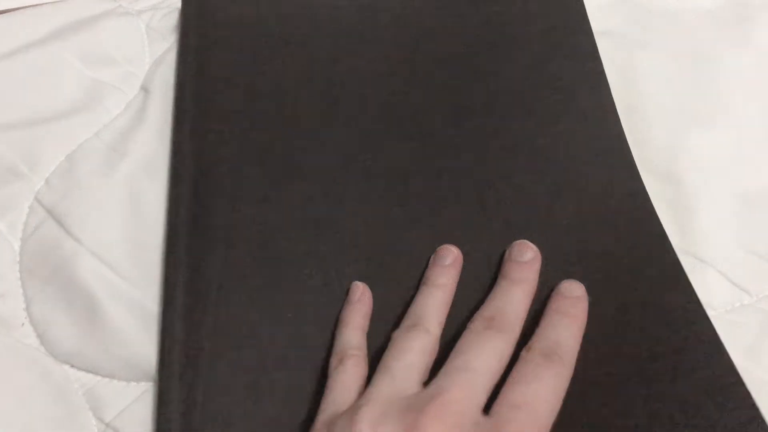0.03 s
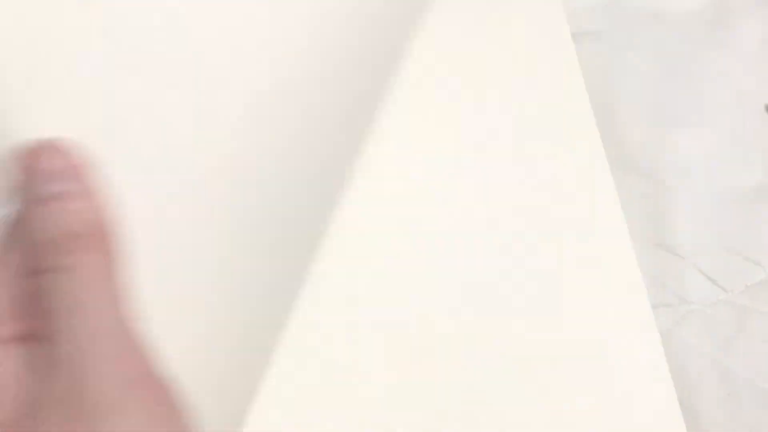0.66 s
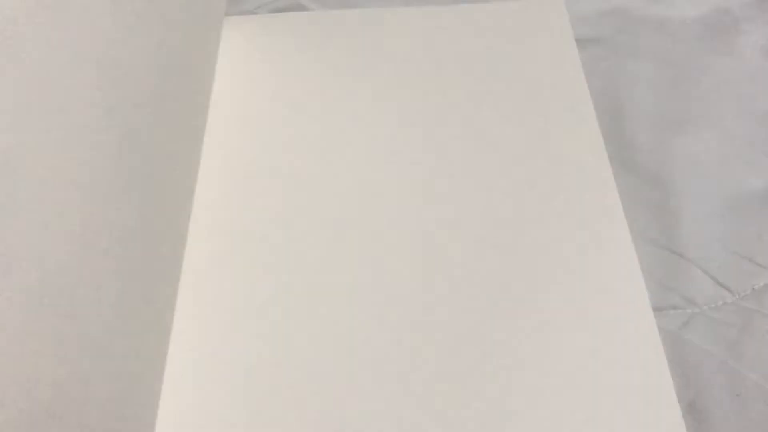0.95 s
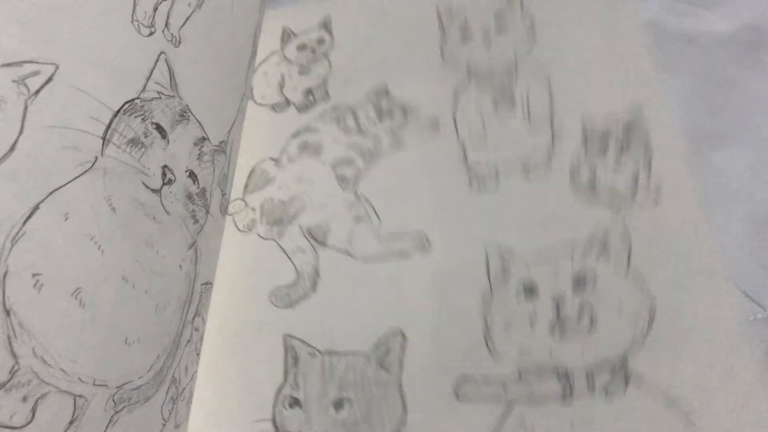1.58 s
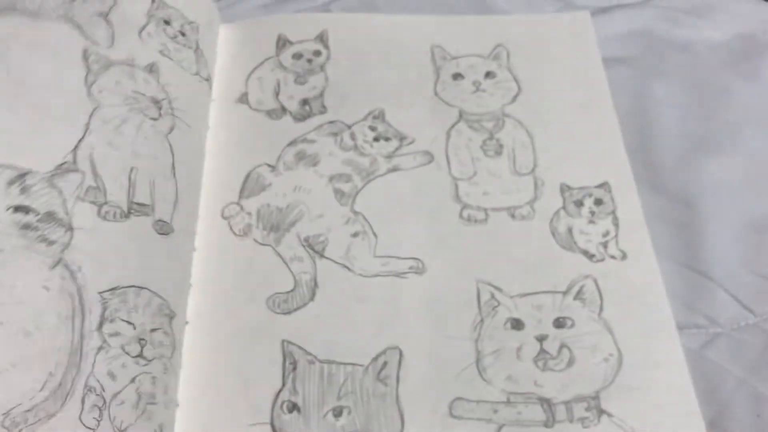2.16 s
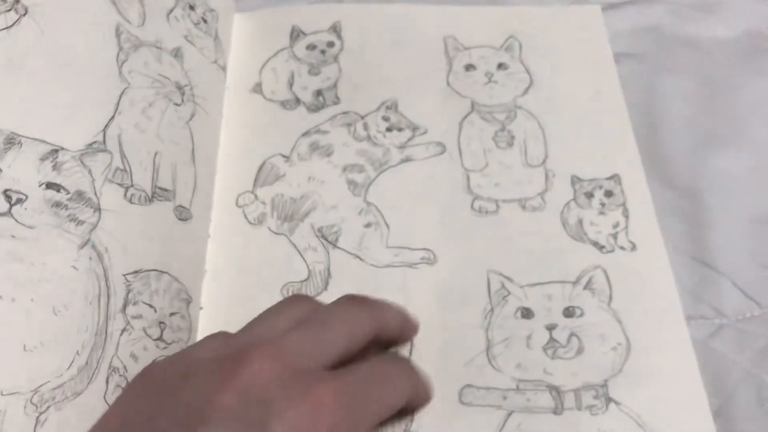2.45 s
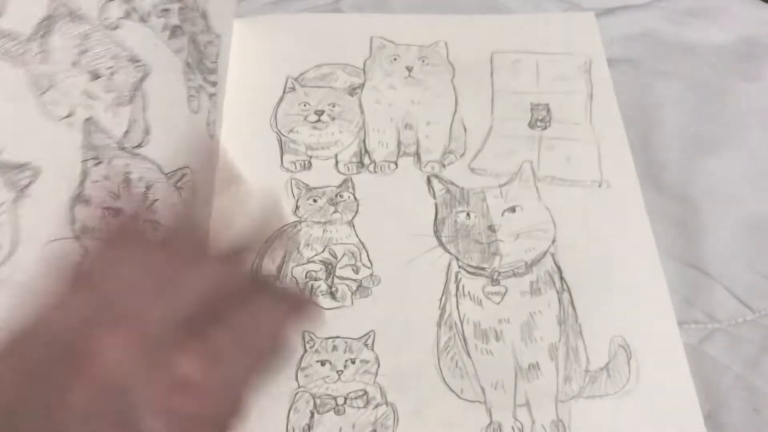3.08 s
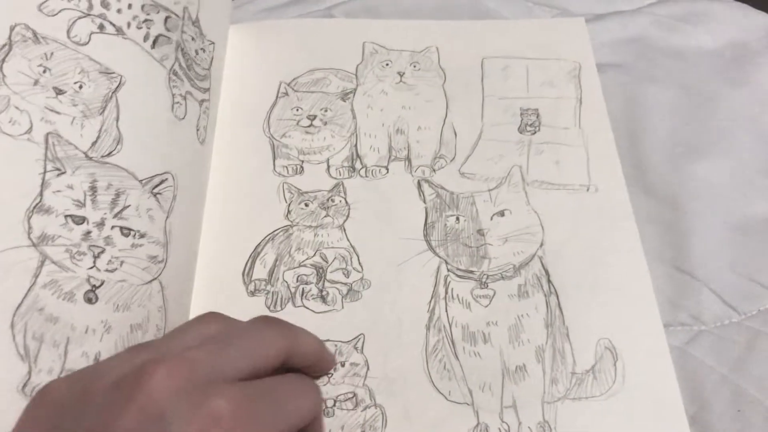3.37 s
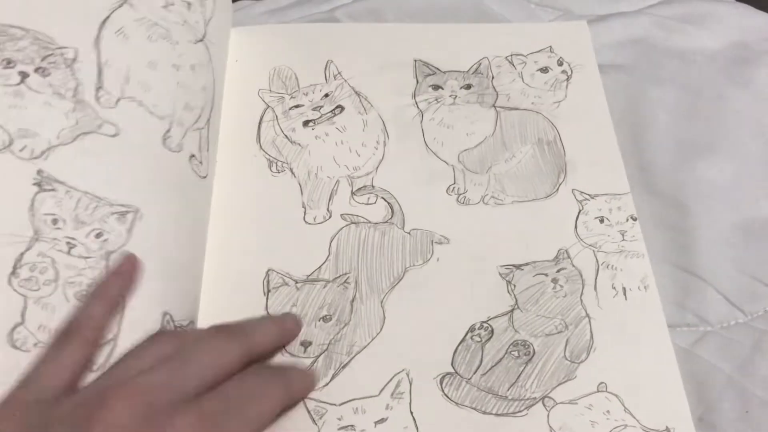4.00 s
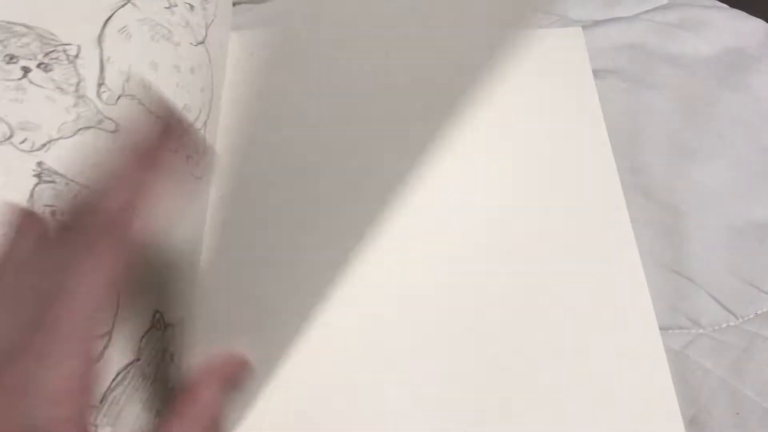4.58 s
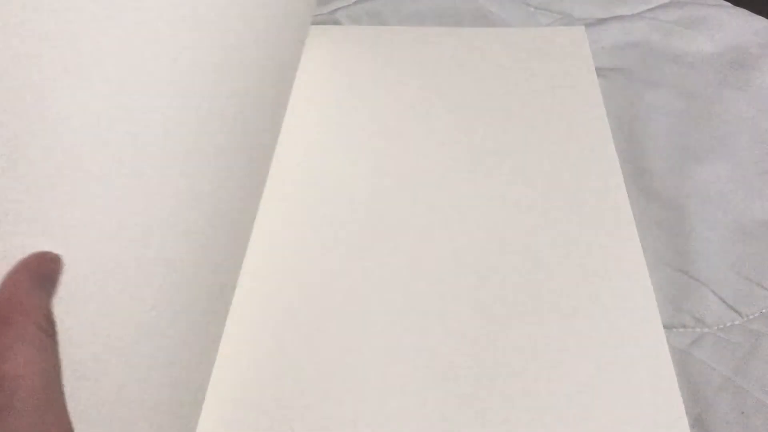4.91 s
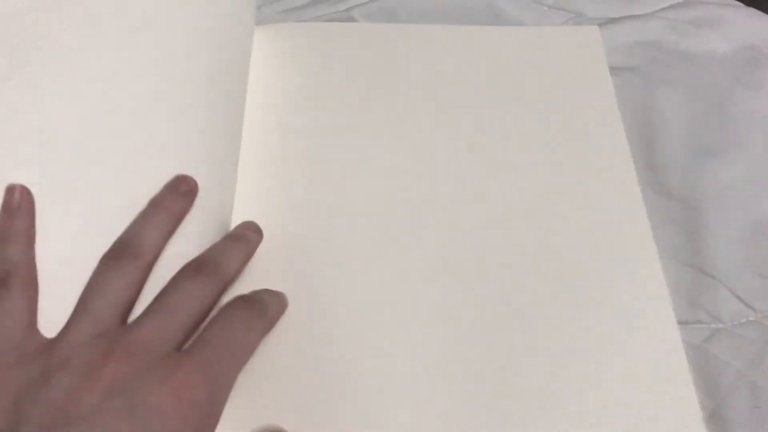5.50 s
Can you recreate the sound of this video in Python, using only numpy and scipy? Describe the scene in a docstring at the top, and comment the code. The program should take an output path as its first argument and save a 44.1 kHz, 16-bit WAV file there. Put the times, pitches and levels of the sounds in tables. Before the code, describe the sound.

Close, dry paper rustles and page turns, soft at first and then louder, with light ticks and a couple of crisp slaps.

```python
"""Leafing through a sketchbook.

A hardcover sketchbook on a quilt is opened and leafed through, close by in a quiet room.
Paper slides on paper and under fingers with a grainy hiss; the sheets resonate and flap, their edges
tick, and they buckle or land with short pops whose bending waves arrive treble first."""
import sys
import numpy as np
from scipy import signal
from scipy.fft import rfft, irfft, next_fast_len
from scipy.io import wavfile
from scipy.ndimage import map_coordinates

SR = 44100
rng = np.random.default_rng(int(sys.argv[2]) if len(sys.argv) > 2 else 0)


def wav_out(sig):
    """Save sig, one row per channel (or a flat mono array), as 16-bit PCM at SR to the path in sys.argv[1]."""
    wavfile.write(sys.argv[1], SR, np.round(np.clip(np.atleast_2d(sig).T, -1, 1) * 32767).astype(np.int16))


N = 249165
TIME = np.arange(N) / SR
# spectrum of edge ticks and crackle: (frequency [Hz], level [dB])
TICK_SPECTRUM = [(300, -4), (1500, -1), (5000, 0.5), (8000, -0.5), (15000, -1.5)]


def sliding():
    """Friction hisses at the contact and rings the sheet; the moving page pushes air and crinkles."""
    # spectra of friction, sheet resonance and flapping: (frequency [Hz], level [dB])
    hiss_spectrum = [(500, -53), (1500, -14), (3500, -4), (5500, -4), (6800, -0.5), (9300, 0.5),
                     (11000, -0.5), (13000, 1), (15500, 2)]
    sheet_spectrum = [(200, -19.5), (450, -8), (750, 0), (1100, 2.5), (1600, -0.5), (2150, -2.5),
                      (2800, 0.5), (3500, -4.5), (4700, -6), (5500, -3), (6700, -11.5), (14000, -21.5)]
    flap_spectrum = [(25, -31), (55, -0.5), (110, 5), (190, -0.5), (300, -1), (420, -14), (800, -17.5),
                     (2000, -45)]
    hiss_gain, sheet_gain, flap_gain = motion_gains()
    judder = wander(rate_hz=140)  # uneven stick-slip
    hiss = colour(grit(per_s=7600, spread_db=0.5, smooth=1.0), hiss_spectrum)
    hiss = flex(hiss, depth_db=5.0, rate_hz=27)
    sheet = colour(grit(per_s=2500, spread_db=0.5, smooth=0.97), sheet_spectrum)
    sheet = flex(sheet, depth_db=2.47, rate_hz=22)
    flap = colour(rng.standard_normal(N), flap_spectrum)
    return (glance(hiss) * hiss_gain * undb(0.75 * judder)
            + glance(sheet) * sheet_gain * undb(1.9 * judder)
            + (flap + crackle()) * flap_gain)


def motion_gains(rest_hiss_db=-66.5, rest_sheet_db=-72.5, drag_flap_db=-15):
    """Strokes and page swings add in power to give the hiss, sheet and flap gains."""
    # sliding strokes: (time [s], length [s], crest [share of length], hiss [dB], sheet [dB])
    strokes = [(0.185, 0.38, 0.62, -61, -60), (0.297, 0.19, 0.5, -48, -63),
               (0.654, 0.56, 0.37, -66.5, -62.5), (0.96, .07, 0.52, -55.5, -54.5),
               (1.081, 0.24, 0.55, -57.5, -55), (1.322, 0.078, 0.43, -55, -51.5),
               (1.851, 0.26, 0.54, -68, -56.5), (1.925, 0.08, 0.61, -53.5, -58),
               (2.141, 0.082, 0.12, -62, -51.5), (2.291, 0.072, 0.57, -79, -56.5),
               (2.397, .16, 0.56, -44.5, -59), (2.565, 0.21, 0.34, -53, -64), (2.772, 0.24, 0.52, -41, -53),
               (2.934, 0.12, 0.58, -43.5, -43), (3.055, 0.15, 0.31, -38.5, -45.5),
               (3.198, 0.18, 0.26, -49, -54.5), (3.329, 0.14, 0.067, -45, -50),
               (3.492, 0.049, 0.63, -45.5, -66), (3.55, 0.39, 0.27, -41, -50),
               (3.761, 0.089, 0.1, -37.5, -37.5), (3.802, .13, 0.35, -37.5, -38),
               (3.928, 0.096, 0.4, -36.5, -45), (4.0, 0.19, 0.19, -54, -54),
               (4.136, 0.21, 0.23, -52.5, -49.5), (4.257, 0.08, 0.67, -44.5, -52.5),
               (4.332, 0.19, 0.72, -49, -54.5), (4.446, 0.14, 0.66, -36.5, -50),
               (4.567, 0.15, .35, -37, -48), (4.673, 0.092, 0.5, -49.5, -42),
               (4.757, 0.13, 0.63, -79, -48.5), (4.868, 0.11, 0.59, -42.5, -43.5),
               (4.971, 0.072, 0.61, -60, -43), (5.045, 0.22, 0.27, -52, -45.5),
               (5.174, .13, 0.69, -40.5, -41), (5.261, 0.1, 0.23, -31, -43),
               (5.318, 0.32, 0.41, -42.5, -47.5)]
    # swinging pages push air: (time [s], length [s], level [dB])
    swings = [(0.75, 0.11, -61), (1.31, 0.1, -64), (1.63, 0.11, -70), (2.015, 0.26, -60.5),
              (2.392, 0.042, -55), (2.997, 0.13, -48.5), (3.073, 0.15, -43), (3.76, 0.14, -50),
              (3.885, 0.11, -47), (4.03, 0.57, -58), (4.605, 0.21, -46.5), (4.94, .12, -56),
              (5.277, 0.1, -45), (5.391, .06, -53), (5.566, 0.038, -56.5)]
    hiss, sheet = undb(rest_hiss_db) ** 2, undb(rest_sheet_db) ** 2  # the hand is never quite still
    for start, length, crest, hiss_db, sheet_db in strokes:
        speed = stroke_speed(start, length, crest, taper=0.6)
        hiss += (undb(hiss_db) * speed) ** 2
        sheet += (undb(sheet_db) * speed) ** 2
    flap = sheet * undb(drag_flap_db) ** 2  # a rubbed sheet also flaps
    for start, length, db in swings:
        flap += (undb(db) * stroke_speed(start, length, crest=0.3, taper=1.04)) ** 2
    return np.sqrt([hiss, sheet, flap])


def stroke_speed(start_s, length_s, crest, taper):
    """Speed arch: from rest, fastest at the crest, back to rest."""
    progress = np.clip((TIME - start_s) / length_s, 0, 1)
    moving = (progress > 0) & (progress < 1)
    skew = np.log(.5) / np.log(np.clip(crest, .05, .95))
    speed = np.zeros(N)
    speed[moving] = np.sin(np.pi * progress[moving] ** skew) ** taper
    return speed


def grit(per_s, spread_db, smooth):
    """Fibres catch and let go: uneven clicks over a smooth hiss."""
    sizes = undb(spread_db * np.minimum(rng.exponential(size=N), 4))
    clicks = (rng.random(N) < per_s / SR) * sizes * rng.choice([-1, 1], N)
    return unit(unit(clicks) + smooth * rng.standard_normal(N))


def flex(x, depth_db, rate_hz, bands=12, lowest_hz=350):
    """A bending sheet shifts its resonances, so each half octave swells by itself."""
    place = lambda f: np.clip(2 * np.log2(f / lowest_hz), 0, bands - 1)
    parts = (shape(x, lambda f: np.maximum(1 - abs(place(f) - k), 0)) for k in range(bands))
    return unit(sum(part * undb(depth_db * wander(rate_hz)) for part in parts))


def glance(x, delay_s=0.000583, drift=0.28, gain=0.25):
    """Reflection off the moving page and hand: a drifting comb."""
    lag = delay_s * np.exp(drift * wander(rate_hz=5)) * SR
    return unit(x + gain * map_coordinates(x, [np.arange(N) - lag], order=3))


def scuffs():
    """Short strokes bite quickly and ease off, each ringing one gliding resonance."""
    out = np.zeros(N)
    grains = [grit(per_s=2300, spread_db=2.5, smooth=0.38) for _ in range(2)]
    for start, length, db, start_hz, end_hz, width_hz in scuff_rings():
        span = slice(int(start * SR), int((start + length) * SR))
        a, b = (shape(g[span], lambda f: 1 / (1 + (1.25 * f / width_hz) ** 3)) for g in grains)
        phase = 2 * np.pi * np.cumsum(np.geomspace(start_hz, end_hz, len(a))) / SR
        envelope = np.abs(np.sin(np.pi * np.linspace(0, 1, len(a)) ** 0.58)) ** 0.66
        out[span] += undb(db) * envelope * unit(a * np.cos(phase) + b * np.sin(phase))
    return out


def scuff_rings(edge_climb=1.03, edge_width_hz=1400, steady_hz=4440):
    """A lifted page rings at its stiff edge and its bow; a dragged page sings on one patch."""
    # page lifts: (time [s], length [s], edge [Hz], edge [dB], bow [dB])
    lifts = [(1.318, 0.059, 4750, -45, -58), (2.122, 0.019, 4680, -53, -53.5),
             (2.1457, 0.0056, 4920, -43, -62), (2.786, 0.044, 4960, -43.5, -54.5),
             (3.499, 0.053, 4260, -52.5, -66), (3.562, .055, 5200, -40.5, -44.5),
             (4.451, 0.085, 4450, -51.5, -44)]
    # bowed sheet's resonance: (start [Hz], end [Hz], width [Hz])
    bow_ring = (1700, 2050, 570)
    # page drags: (time [s], length [s], level [dB], centre [Hz])
    drags = [(1.314, 0.069, -54.5, 2670), (2.83, 0.14, -53, 6340), (2.956, 0.12, -46.5, 1533),
             (3.328, .14, -56.5, 1518), (3.612, 0.13, -45.5, 5950), (3.78, 0.18, -45.5, 5430),
             (3.814, .052, -40, 2990), (4.145, 0.17, -52.5, 1535), (4.612, 0.072, -46, 5520),
             (4.697, 0.066, -44.5, 5600), (5.064, 0.056, -45.5, 2840), (5.15, 0.41, -51.5, 5540),
             (5.255, 0.07, -39.5, 2870), (5.33, 0.25, -52, 2837)]
    for start, length, hz, edge_db, bow_db in lifts:
        yield start, length, edge_db, hz / edge_climb, hz * edge_climb, edge_width_hz
        yield (start, length, bow_db, *bow_ring)
    for start, length, db, hz in drags:
        glide = (steady_hz / hz) ** 0.0634  # towards steady_hz
        width_hz = 390 + 0.05 * hz
        yield start, length, db, hz / glide, hz * glide, width_hz


def pops(scatter=0.082, travel_1khz_s=.0032, dull_hz=4400, edge_return=0.087, comb_hz=260, size=16384):
    """A snap crosses the sheet as a bending wave and scatters from its edges."""
    out, t = np.zeros(N + size), np.arange(size) / SR
    # wave speed goes as the root of frequency
    travel = lambda f: np.exp(-4j * np.pi * travel_1khz_s * np.sqrt(f * 1000))
    # the wave returns from the page edge, giving each pop a faint hollow ring
    hollow = lambda f: 1 / (1 - edge_return * np.exp(-2j * np.pi * f / comb_hz))
    for start, db, hz, octaves, t60_s in snaps():
        snap = (t == 0) + scatter * rng.standard_normal(size) * undb(-60 * t / t60_s)
        # buckle size sets the pitch; paper absorbs the top
        band = lambda f: (1 + (np.log2(f / hz) / (3 * octaves)) ** 2) ** -8 / (1 + (f / dull_hz) ** 4)
        pop = shape(snap, lambda f: band(f) * travel(f) * hollow(f))
        out[int(start * SR):][:size] += peak(pop, db)
    return out[:N]


def snaps(pop_t60_s=0.062, slap_t60_s=0.031, slap_octaves=0.75, rebound_s=.0036, fade_db_per_s=494):
    """Buckles and taps snap once; a landing page settles in ever slower, weaker rebounds."""
    # sheet buckles and finger taps: (time [s], peak [dB], centre [Hz], width [octaves])
    buckles = [(.447, -37, 760, 0.52), (0.763, -45, 244, 0.44), (1.63, -44, 410, 0.5),
               (2.055, -42, 1540, 0.53), (2.1475, -31, 1100, 2.5), (2.256, -37.5, 1290, 1.6),
               (2.401, -45.5, 1500, 1), (2.422, -43.5, 1500, 0.78), (3.009, -27, 1620, 1.1),
               (3.116, -29, 600, 1.16), (3.129, -27.5, 705, 1.2), (3.489, -40, 476, 1.2),
               (3.759, -31, 1390, 1.1), (3.782, -34, 1500, 1.2), (3.822, -29, 840, 1.1),
               (3.976, -39, 328, 0.54), (4.3485, -29.5, 800, 1.56), (4.612, -29, 2730, 0.18),
               (4.943, -24.5, 1600, 2.2), (4.946, -20, 1150, 3)]
    # page landings: (time [s], peak [dB], centre [Hz])
    slaps = [(4.654, -18.5, 1020), (4.9602, -18.5, 950)]
    for buckle in buckles:
        yield (*buckle, pop_t60_s)
    for start, db, hz in slaps:
        late_s = 0
        for k in range(5):
            yield start + late_s, db - fade_db_per_s * late_s, hz, slap_octaves, slap_t60_s
            late_s += rebound_s * 2.4 ** k


def thumps(push_s=0.012, rattle=0.11, t60_s=0.064, upper_ratio=1.51, upper_db=-5, size=16384):
    """A soft push rings two damped modes of the pages and the air beneath them."""
    # cover, page or hand presses on the book: (time [s], peak [dB], lower mode [Hz])
    presses = [(.765, -35.5, 131), (1.641, -50, 145), (2.053, -48, 119), (2.122, -42.5, 78),
               (2.165, -44.5, 111), (2.432, -43, 71), (3.097, -37, 130), (3.121, -33, 322),
               (3.49, -36, 335), (3.133, -33.5, 110), (3.76, -35.5, 257), (3.787, -37, 194),
               (3.981, -31, 145), (4.354, -40.5, 420), (4.617, -34, 144), (4.662, -33, 119),
               (4.664, -33.5, 286), (4.95, -23, 183), (4.962, -33.5, 83), (4.968, -30.5, 165),
               (5.296, -36.5, 143)]
    out, t = np.zeros(N + size), np.arange(size) / SR
    width_hz = np.log(1000) / (np.pi * t60_s)
    for start, db, hz in presses:
        push = (t == 0) + rattle * rng.standard_normal(size) * np.exp(-t / push_s)
        upper = lambda f: undb(upper_db) * resonance(f, upper_ratio * hz, upper_ratio * width_hz)
        boom = shape(push, lambda f: (resonance(f, hz, width_hz) + upper(f)) * resonance(f, hz, 2 * hz))
        out[int(start * SR):][:size] += peak(boom, db)
    return out[:N]


def ticks(drag_s=.003, release_s=.00255, gain_db=-10):
    """An edge drags harder and harder, then slips free."""
    # page edges flick past each other: (time [s], relative level [dB])
    flicks = [(.452, -40.5), (1.233, -30.5), (1.254, -26), (1.2787, -26), (2.04, -38), (2.149, -35),
              (2.391, -41), (2.403, -39), (2.422, -36), (2.539, -42), (3.024, -31), (3.133, -26),
              (3.159, -23.5), (3.337, -31), (3.86, -21.5), (3.982, -25), (4.953, -23)]
    force = np.zeros(N)
    for slip, db in flicks:
        log_force = np.minimum((TIME - slip) / drag_s, (slip - TIME) / release_s)
        force += undb(db) * np.exp(log_force.clip(-30, 0))
    fibres = grit(per_s=5000, spread_db=2.5, smooth=.8)
    return undb(gain_db) * force * colour(fibres, TICK_SPECTRUM)


def crackle(ring_s=0.00066, relative_db=-2.5, size=256):
    """Fibres and creases give way with tiny dry snaps."""
    snap = rng.standard_normal(size) * np.exp(-np.arange(size) / SR / ring_s)
    clicks = grit(per_s=170, spread_db=-0.5, smooth=0)
    return undb(relative_db) * colour(signal.fftconvolve(clicks, snap)[:N], TICK_SPECTRUM)


def reflections(x, t60_s=0.11, gap_s=.005, wet_db=-19, size=16384):
    """The softly furnished room returns a faint, dull tail."""
    t = np.arange(size) / SR
    # (frequency [Hz], level [dB])
    spectrum = [(100, -5.5), (1500, 7.0), (6000, -1.5), (15000, -6.5)]
    tail = colour(rng.standard_normal(size), spectrum) * undb(-60 * t / t60_s) * (t > gap_s)
    return undb(wet_db) * signal.fftconvolve(x, tail / np.linalg.norm(tail))[:N]


def room_noise(level_db=-61.5):
    """Steady room and microphone noise."""
    # noise density: (frequency [Hz], relative level [dB])
    spectrum = [(20, -12), (60, 1), (120, 1.5), (220, -1.5), (500, -7.5), (1000, -15), (2000, -23),
                (5000, -22), (7500, -26.5), (9300, -18.5), (10200, -27), (11200, -49), (13000, -25),
                (15500, -24)]
    return undb(level_db) * colour(rng.standard_normal(N), spectrum)


def undb(db):
    """Decibels to gain."""
    return 10 ** (np.asarray(db) / 20)


def unit(x):
    """Scale to rms 1."""
    return x / np.sqrt(np.mean(x ** 2))


def peak(x, db):
    """Scale to a peak level."""
    return x * undb(db) / np.abs(x).max()


def shape(x, response):
    """Filter by a function of frequency."""
    size = next_fast_len(len(x))
    hz = np.maximum(np.arange(size // 2 + 1) * SR / size, 1)
    return irfft(rfft(x, size) * response(hz), size)[:len(x)]


def colour(x, points):
    """Filter by (frequency [Hz], level [dB]) points; scale to rms 1."""
    hz, db = np.transpose(points)
    return unit(shape(x, lambda f: undb(np.interp(np.log(f), np.log(hz), db))))


def resonance(f, hz, width_hz):
    """Response of one damped mode."""
    return 1 / (1 + 1j * (f * f - hz * hz) / (f * width_hz))


def wander(rate_hz):
    """Smooth random drift, spread near 1."""
    knots = rng.standard_normal(N // 20)
    return np.interp(TIME * rate_hz, np.arange(len(knots)), knots)


def scene():
    """Paper sounds and their reflections over the still room, mono."""
    paper = sliding() + scuffs() + pops() + thumps() + ticks()
    room = room_noise()
    return (paper + reflections(paper) + room)[None]


def record(dry):
    """Steep low-pass at 15.9 kHz."""
    return signal.sosfilt(signal.ellip(12, .1, 80, 15900, fs=SR, output="sos"), dry)


dry = scene()
out = record(dry)
wav_out(out)
```